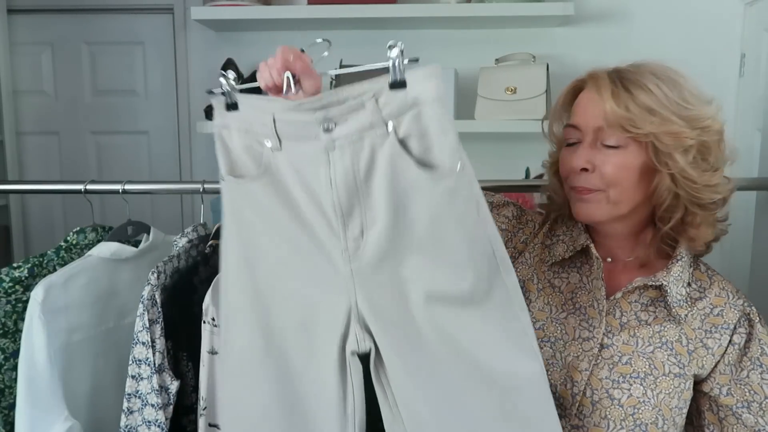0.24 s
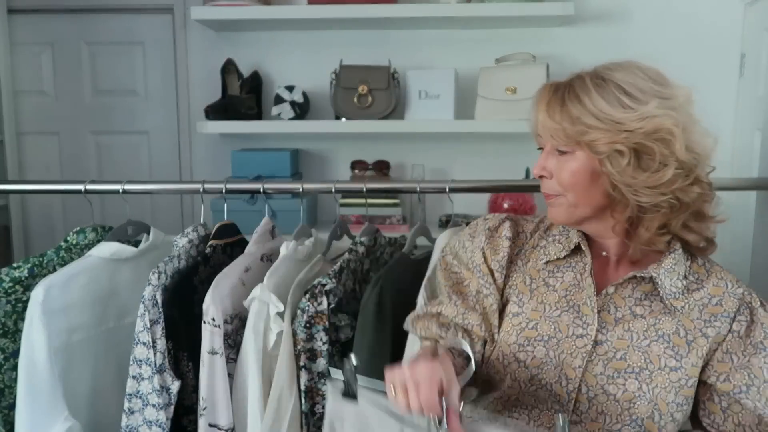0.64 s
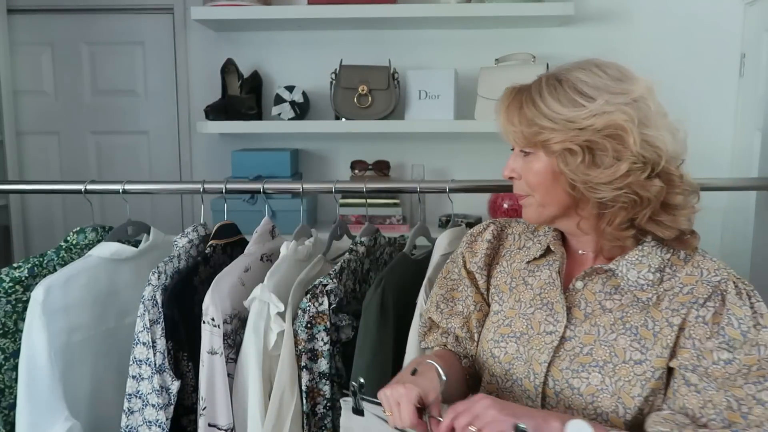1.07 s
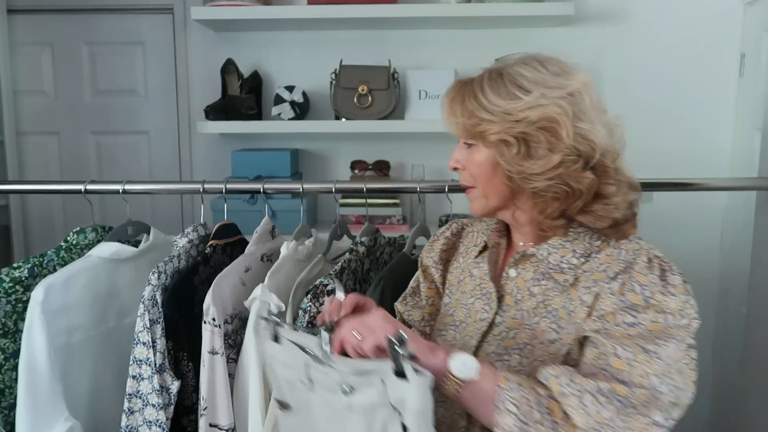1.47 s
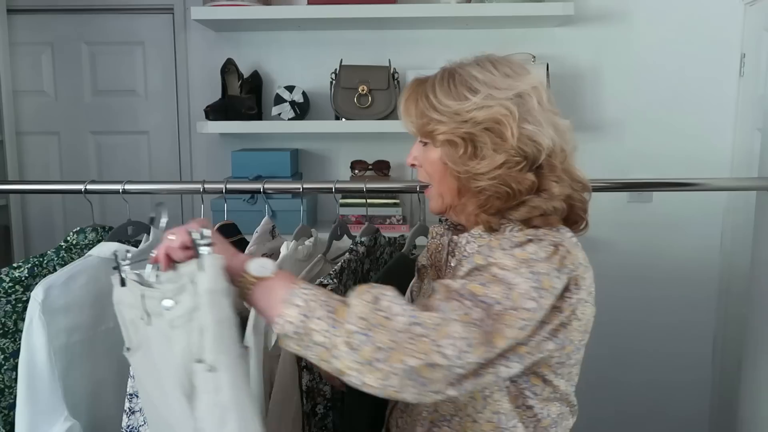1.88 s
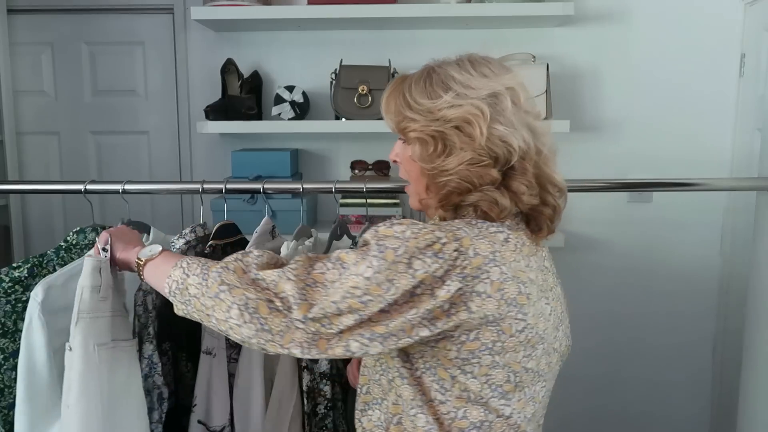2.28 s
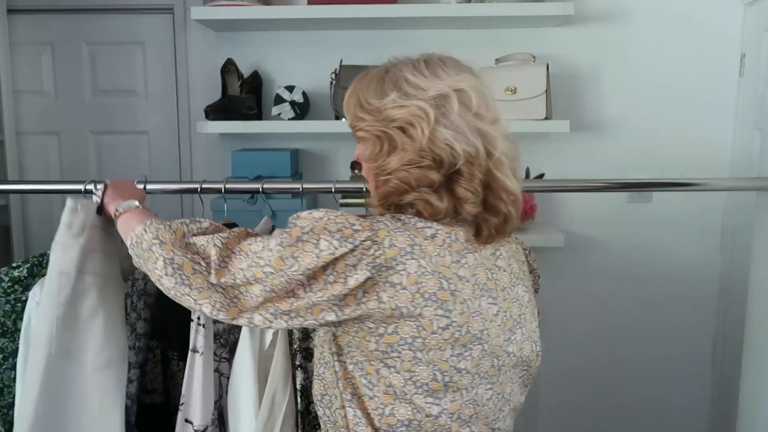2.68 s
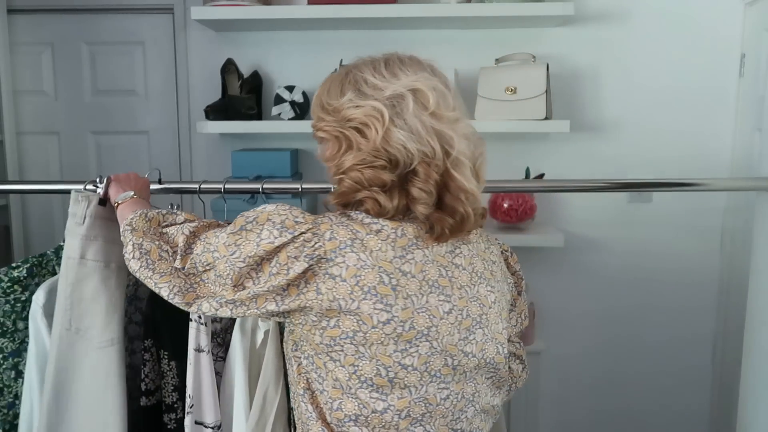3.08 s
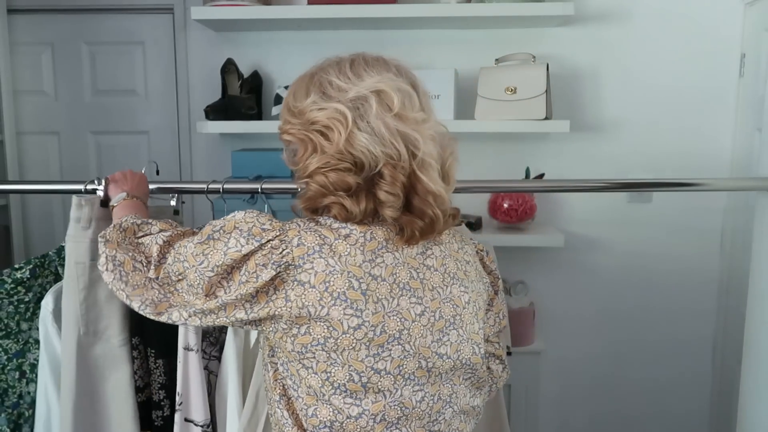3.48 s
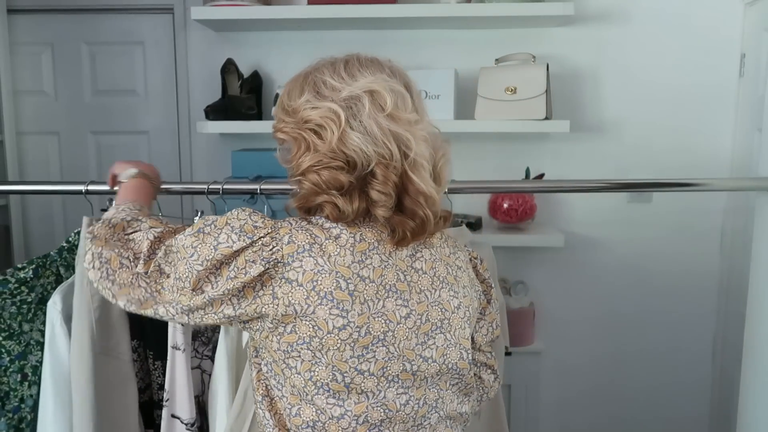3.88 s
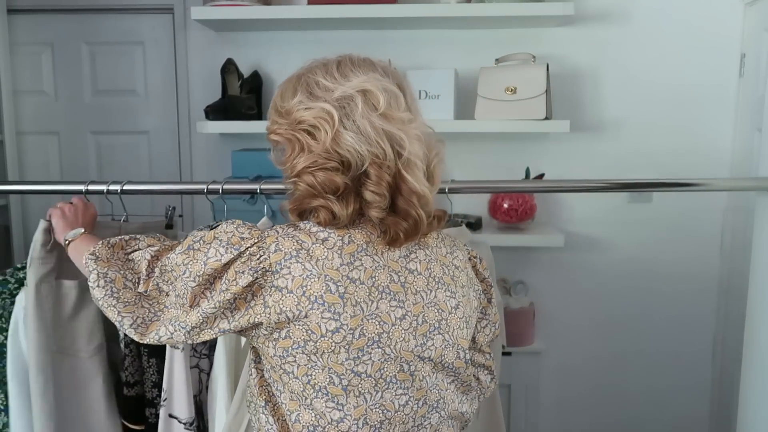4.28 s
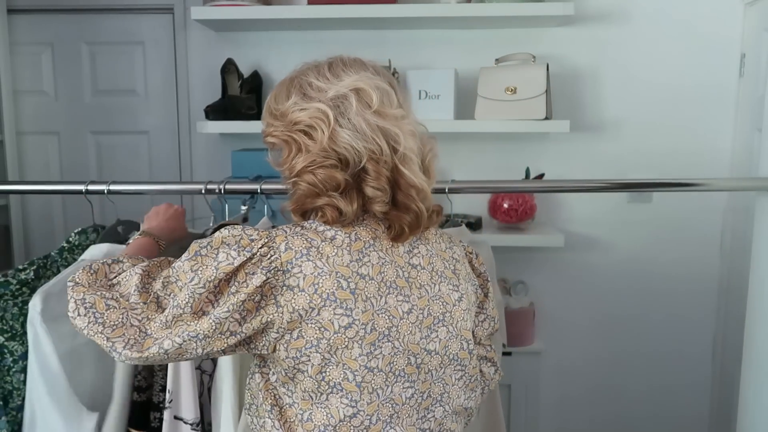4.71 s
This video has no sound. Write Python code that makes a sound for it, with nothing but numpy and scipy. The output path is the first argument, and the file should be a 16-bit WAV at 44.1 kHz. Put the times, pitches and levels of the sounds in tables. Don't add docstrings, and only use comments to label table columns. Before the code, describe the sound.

Quiet rustling and hollow rack knocks lead to three sharp metallic hanger strikes on a tube, then short gritty hook slides.

```python
import sys
import numpy as np
from scipy import signal
from scipy.fft import rfft, irfft, next_fast_len
from scipy.io import wavfile
from scipy.ndimage import uniform_filter1d

SR = 44100
rng = np.random.default_rng(int(sys.argv[2]) if len(sys.argv) > 2 else 0)


def gain_from_decibels(decibels):
    exponent = np.asarray(decibels, float) / 20
    return 10 ** exponent


def to_wav(s):
    ch = np.atleast_2d(s).T
    pcm = np.round(np.clip(ch, -1, 1) * 32767)
    wavfile.write(sys.argv[1], SR, pcm.astype(np.int16))


N = 218198


def evened(x):
    return x / np.sqrt(np.mean(x ** 2) + 1e-20)


def read(points, hz):
    f, value = np.transpose(points)
    return np.interp(np.log(hz + 1), np.log(f + 1), value)


def coloured(x, points):
    gain = gain_from_decibels(read(points, np.fft.rfftfreq(x.shape[-1], 1 / SR)))
    return irfft(rfft(x) * gain, x.shape[-1])


def add(mix, s, sound, peak_db):
    part = mix[round(s * SR):][:len(sound)]
    part += gain_from_decibels(peak_db) * sound[:len(part)] / abs(sound).max()


def softness(db, hard_db, fastest):
    return fastest * gain_from_decibels(0.3 * max(hard_db - db, 0))


def ring(modes, rise, spread=0, split=4.0, slow_hz=900, beat=.35, steep=1):
    t = np.arange(SR // 2) / SR
    luck = rng.random((len(modes), 7))
    hz, db, t60 = np.transpose(modes)[:, :, None]
    hz = hz * (1 + spread * (luck[:, :1] - .5))
    triple = 0
    for k in (-1, 0, 1):
        neighbour_hz = hz + split / t60 * (k + luck[:, [k + 5]] - .5)
        phase = luck[:, [k + 2]]
        triple = triple + np.sin(2 * np.pi * (neighbour_hz * t + phase)) * beat ** abs(k)
    onset = 1 - np.exp(-t / (rise * (1 + (slow_hz / hz) ** steep)))
    return (gain_from_decibels(db - 60 * t / t60) * triple * onset).sum(0)


def rattle(points, t60, rise, bass_lag=0.):
    t = np.arange(SR // 4) / SR
    collisions = rng.standard_normal(len(t)) * gain_from_decibels(7.03 * rng.standard_normal(len(t)))
    grit = evened(coloured(collisions, points))
    bass = coloured(grit, [(1100, 0), (1900, -40)])
    bass_missing = np.exp(-(t / (bass_lag + 1e-6)) ** 2)
    return (grit - bass * bass_missing) * gain_from_decibels(-60 * t / t60) * (1 - np.exp(-t / rise))


def resonate(x, hz, width):
    turn = np.exp(2j * np.pi * np.cumsum(hz) / SR)
    r = np.exp(-np.pi * width / SR)
    return 2 * (turn * signal.lfilter([1 - r], [1, -r], x / turn)).real


def clacks():
    # (time [s], level [dB], rattle t60 [s], rise [s], hanger ring over rattle [dB])
    blows = [
        (2.873, -17.5, 0.048, 0.0015, 1.5),
        (3.4345, -23, 0.046, 0.0017, -0.5),
        (3.7254, -11.5, 0.051, 0.0011, 1),
    ]
    # (frequency [Hz], density [dB per Hz])
    rattles = [
        [(120, -64), (260, -18), (410, -14), (520, -1.5), (722, -10), (1980, -19), (2290, -26), (2650, -21.5),
         (3760, -26), (6000, -39.5), (7500, -34), (12200, -51), (16000, -112)],
        [(120, -42), (200, -5), (450, -1), (1330, -20), (1460, -39), (2150, -13.5), (2320, -11), (2740, -10),
         (3000, -14), (6270, -22.5), (7680, -20), (9940, -40), (11300, -26.5), (16400, -37)],
        [(120, -52), (200, -11), (650, -36), (842, 5.5), (1460, -21.5), (2840, -1), (3740, -8), (5120, -2.5),
         (6400, -15), (7970, -9.5), (9580, -26), (11300, -16), (13100, -46), (14400, -22), (16400, -53)],
    ]
    # (time [s], level [dB])
    bounces = [
        (2.88, -22.5),
        (3.4375, -23),
        (3.7274, -13),
    ]
    # (time [s], level under the blow [dB])
    swings = [
        [(2.887, -15), (2.899, -8.5), (2.922, -9.5)],
        [(3.447, -16), (3.461, -7.5)],
        [(3.735, -3), (3.7435, -8)],
    ]
    stilled = [3.17, 3.7, 3.957]
    tube_hz = [2556, 2592, 7232]
    # (level [dB], t60 [s])
    tube_modes = [(0, 1.1), (-9, .4), (-9, .45)]
    tube_db = [-41, -51, -37.5]
    wire_hz = [318, 500, 651, 815, 1345, 1510, 1687, 1886, 2142, 2505, 2625, 2745, 3585, 4955]
    # (level [dB], t60 [s])
    wire_modes = [(-13, 0.19), (-7.5, 0.17), (-11, 0.19), (-6, 0.16), (-9, 0.1), (-8.5, 0.14), (-16, 0.27),
                  (-18, 0.25), (-6.5, 0.18), (-11, 0.17), (-12, 0.32), (-19, 0.24), (-24.5, 0.12),
                  (-21, 0.068)]
    clip_hz = [307, 1663, 2137, 2428, 2700, 4204, 4646, 6401, 6842, 7418, 7876, 8603, 11000, 14100]
    # (level [dB], t60 [s])
    clip_modes = [(-18, 0.35), (-22, 0.18), (-4, 0.2), (-22, 0.056), (-29, 0.15), (-11, 0.086), (5, 0.019),
                  (-32, 0.11), (-23, .14), (-13, 0.082), (-14, 0.12), (-17.5, .1), (-16, 0.08), (-23, 0.11)]
    heavy_hz = [305, 820, 945, 1884, 2130, 2505, 2826, 2948, 3176, 3510, 4270, 4975, 5115, 5368]
    # (level [dB], t60 [s])
    heavy_modes = [(-21, 0.17), (-11, 0.089), (-20, 0.18), (-26, 0.29), (1.5, 0.25), (-20, 0.091),
                   (5.5, 0.084), (0, 0.1), (-1, 0.18), (0, 0.053), (-3, 0.088), (-1, 0.065), (9.5, 0.071),
                   (1, 0.12)]

    crash, tones = np.zeros((2, N))
    tube = [(hz, *strength) for hz, strength in zip(tube_hz, tube_modes)]
    hangers = (wire_hz, wire_modes), (clip_hz, clip_modes), (heavy_hz, heavy_modes)
    for k, (s, db, t60, rise, ring_db) in enumerate(blows):
        burst = rattle(rattles[k], t60, rise, bass_lag=0.0093)
        hanger = [(hz, level, min(long, .4)) for hz, (level, long) in zip(*hangers[k])]
        hanger_ring = ring(hanger, rise, slow_hz=1340, beat=.2, steep=2.65)
        for at, less_db in ((s, 0), *swings[k]):
            add(crash, at, burst, db + 2.2 * less_db)
            add(tones, at, hanger_ring, db + ring_db + less_db)
        bounce_s, bounce_db = bounces[k]
        add(crash, bounce_s, rattle(rattles[k], 0.018, 0.00052, bass_lag=0.0096), bounce_db)
        left = stilled[k] - s - np.arange(SR // 2) / SR
        damping = gain_from_decibels(np.minimum(left, 0) * 900)
        add(tones, s, ring(tube, rise, beat=.13) * damping, tube_db[k])
    return crash, tones


def touches():
    # (time [s], level [dB])
    contacts = [
        (2.876, -21.5),
        (2.944, -29.5),
        (3.471, -36),
        (3.499, -48),
        (3.77, -24.5),
        (3.798, -34.5),
    ]
    # (frequency [Hz], level [dB], t60 [s])
    wall = [(2300, -11, 0.066), (2550, 0, 0.065), (2652, -6.5, 0.13), (2640, -2, 0.061), (2750, -3, 0.14),
            (2710, -2, 0.12)]
    out = np.zeros(N)
    for s, db in contacts:
        add(out, s, ring(wall, .002, spread=0.023, beat=0.67), db)
    return out


def pings():
    # (time [s], level [dB], frequency [Hz], rise [s], t60 [s])
    single_rings = [(1.363, -29.5, 162.3, 0.0053, 0.17), (1.377, -29, 748, 0.0019, 0.081),
                    (1.577, -39, 9930, 0.00027, 0.0066), (1.587, -36, 4500, 0.00033, 0.0065),
                    (1.6805, -29.5, 2270, 0.00018, 0.0039), (1.719, -36.5, 2200, .0002, 0.0068),
                    (1.7475, -39, 5400, 0.00018, 0.004), (1.7475, -52, 11600, .0002, .006),
                    (2.874, -21.5, 2142, 0.0043, 0.25), (2.88, -28, 2640, 0.007, 0.11),
                    (2.878, -31, 2860, .006, .13), (2.88, -48, 7240, 0.0035, 0.27),
                    (1.3605, -36.5, 1306, .0005, .03), (1.364, -30.5, 532, 0.0022, 0.071),
                    (1.575, -33, 540, .003, .08), (2.417, -39, 529, .003, 0.083),
                    (3.436, -45, 14900, .001, 0.037), (3.44, -38, 2620, .004, 0.17),
                    (3.727, -30, 14600, .0006, .04), (3.73, -42, 7300, .004, 0.28),
                    (3.775, -35.5, 2824, 0.0064, 0.15), (4.622, -50, 2680, .003, 0.045),
                    (2.877, -31.5, 498, 0.0027, 0.094), (2.885, -33, 259, 0.0072, 0.12),
                    (2.893, -43, 1140, 0.0033, 0.13), (2.925, -44, 658, 0.0092, 0.24),
                    (3.7277, -10, 5020, .0003, .012), (4.435, -52, 3600, 0.0017, 0.037),
                    (4.437, -54, 4600, 0.0018, 0.034), (4.726, -39, 240, 0.0043, 0.076),
                    (2.915, -26, 322.7, 0.0046, 0.085), (3.447, -39.5, 305, .008, 0.19),
                    (3.734, -22.5, 1104, 0.0014, 0.025), (3.74, -21.5, 830, 0.0034, 0.076),
                    (3.742, -30.5, 301, 0.017, 0.12), (3.785, -42, 940, 0.0064, 0.13),
                    (3.9592, -45, 2220, .0003, .015), (3.96, -44, 1120, 0.00062, 0.017)]
    out, t = np.zeros(N), np.arange(SR // 4) / SR
    for s, db, hz, rise, t60 in single_rings:
        envelope = (1 - np.exp(-t / rise)) ** 2 * gain_from_decibels(-60 * t / t60)
        add(out, s, np.sin(2 * np.pi * hz * t) * envelope, db)
    return out


def slides():
    # (hardest push [s], rise [s], fall [s], level [dB], share of plain grit [0-1])
    pushes = [
        [(1.682, 0.0039, 0.027, -50.5, 0.54), (1.753, 0.024, 0.017, -50, 0.3), (1.8, 0.038, 0.13, -59, 0.64)],
        [(4.245, 0.035, 0.026, -51.5, 0.34), (4.3, 0.023, 0.016, -46.5, 0.32),
         (4.34, 0.021, 0.031, -52.5, 0.36)],
        [(4.63, 0.018, 0.044, -46, 0.1), (4.73, 0.019, 0.028, -44, 0), (4.815, 0.043, 0.018, -47, 0.57)],
    ]
    # (frequency [Hz], width [Hz], level in first, second and third push [dB])
    woken = [
        [(1330, 300, -3, -8, -7), (1890, 400, -1, 7, 11), (2640, 270, -10, -6, -13), (6000, 1200, -4, -8, -16),
         (10900, 1300, -25, -16, -23)],
        [(285, 40, 4, -3, -15), (1127, 41, 3, 10, 7), (2140, 55, -12, -11, -15), (2450, 36, 2, 1, 0),
         (2910, 41, -7, -10, -13), (3870, 26, -25, -26, -8), (5060, 60, -17, -17, -12),
         (5770, 51, -17, -18, -14), (7500, 39, -19, -23, -25)],
        [(305, 14, 8.5, 5.5, -1), (1370, 29, 4, -15, -4), (2176, 33, -2, 1, -13), (2480, 32, -16, -1, 4),
         (2760, 72, -12, -1, -6), (4570, 40, -18, -8, -16), (4950, 70, -12, -8, -12), (5470, 63, -24, -19, -8),
         (7440, 46, -22, -16, -10), (8250, 80, -19, -14, -28), (9900, 55, -22, -15, -32),
         (11100, 60, -25, -20, -33)],
    ]
    push_db = 6.5
    wander, patchy_db = .006, 1.5

    out = np.zeros(N + SR)
    for rows, peaks in zip(pushes, woken):
        start = rows[0][0] - .3
        t = start + np.arange(SR) / SR
        unevenness = evened(uniform_filter1d(rng.standard_normal(len(t)), 250))
        slips = rng.standard_normal(len(t)) * gain_from_decibels(1.4 * unevenness)
        place = uniform_filter1d(rng.standard_normal(len(t)), 1500)
        place = evened(uniform_filter1d(place, 1500))
        tones = []
        for k, (hz, width, *_) in enumerate(peaks):
            swell = gain_from_decibels(patchy_db * np.roll(place, k * SR // 11))
            tones.append(swell * resonate(slips, hz * (1 + wander * place), 1.4 * width))
        grit = evened(coloured(slips, [(300, -27), (2500, 37.5), (6000, 25.0), (10500, -22)]))
        *tones, grit = coloured(np.vstack([*tones, grit]), [(10500, 9), (13000, -11)])
        for (s, rise, fall, db, share), woken_db in zip(rows, np.transpose(peaks)[2:]):
            away = np.where(t < s, (s - t) / rise, (t - s) / fall)
            share = np.clip(share, 0, 1)
            ringing = gain_from_decibels(13.5) * evened(gain_from_decibels(woken_db) @ tones)
            scrape = evened((1 - share) * ringing + share * grit)
            out[int(start * SR):][:SR] += scrape * gain_from_decibels(db - push_db * away ** 1.07)
    return out[:N]


def ticks():
    # (time [s], level [dB], body level [dB], brightness [0-1], rattle t60 [s])
    contacts = [(0.368, -45, 2, 0.87, 0.48), (0.882, -43, -23, 0.85, 0.035), (1.044, -41.5, -26, 1.1, 0.02),
                (1.509, -44.5, -33, 0.9, 0.02), (0.926, -45, 10, 0.9, 0.11), (1.359, -30, 8, 0, 0.076),
                (1.5734, -22.5, 2, 0.92, 0.076), (1.6807, -31, 2.5, 0.5, 0.053),
                (1.718, -38.5, -20, 1, 0.04), (1.7438, -39.5, -2, 0.7, 0.063), (2.153, -47, -29, 0, 0.29),
                (2.4865, -33.5, -11, 0.26, 0.023), (2.4914, -32, 16, 1, 0.036), (2.507, -46, 7, 0, 0.027),
                (2.812, -35, -9, 1, 0.12), (3.272, -37, 6, 0, 0.045), (3.3638, -30, -10, 0.8, 0.033),
                (3.368, -25.5, 1.5, 0.86, 0.024), (3.4255, -28.5, -3, 1, 0.17),
                (3.713, -33.5, 19, 1.1, 0.31), (3.9583, -35.5, -21, 0.91, 0.036),
                (4.118, -33.5, -6.5, 0.56, 0.032), (4.4347, -45.5, -6, 1, 0.056),
                (4.548, -42, -16, 0.9, 0.043), (4.6091, -45, -8, 0.4, 0.14), (4.714, -37, -15, 1, 0.04)]
    band_hz = [550, 2100, 5000, 10000]
    dull_db = [-21.5, -59]
    sharp_db = [1.5, -14]
    out = np.zeros(N)
    for s, db, body_db, sharp, t60 in contacts:
        bright, top = np.add(dull_db, sharp * np.subtract(sharp_db, dull_db))
        per_hz = np.array([body_db, 0, bright, top]) - 10 * np.log10(band_hz)
        colour = [(150, per_hz[0] - 15), *zip(band_hz, per_hz), (16000, per_hz[3] - 12)]
        add(out, s, rattle(colour, t60, softness(db, -23, 0.0003)), db)
    return out


def thuds():
    # (time [s], level [dB], knock [dB], boom [dB], deep [dB])
    steps = [(0.897, -39, -28, -23, -6), (0.912, -37, -5.5, -29, 0), (0.944, -54, 8.5, -26, -21),
             (1.3592, -23.5, -8, -14, -3.5), (1.573, -36.5, -2, -22, -16), (2.337, -44.5, -6, -28, 1),
             (2.345, -45.5, -8, -28, -4), (2.415, -32, -9, -5.5, -13), (2.453, -40.5, -28, -26, 20),
             (3.561, -50, -18, -25, -5), (4.276, -45, -6.5, -27, -28), (4.728, -51, 6, -25, 6),
             (4.93, -45, -28, -20, 7)]
    # (frequency [Hz], level [dB], t60 [s])
    boards = [(71.4, -19.5, 0.66), (151.2, 2.0, 0.22), (242.3, -4.0, 0.39), (323.3, -1.0, 0.14),
              (431, -18.5, 0.24), (483, -22.5, 0.32), (707, -9.5, 0.066), (900, -16, 0.1),
              (985, -36.0, 0.18), (1354, -48.0, 0.3), (273.0, -2.5, 0.21), (2084, -30, 0.03)]
    heavy_ring, ring_per_db = 0.7, -0.0141
    out = np.zeros(N)
    for s, db, knock, boom, deep in steps:
        length = heavy_ring + ring_per_db * (-30.0 - db)
        lift = [(70, boom + 12), (155, deep + 3), (236, 0.011), (431, 0.0018), (570, knock + 6)]
        modes = [(hz, level + read(lift, hz), length * t60) for hz, level, t60 in boards]
        add(out, s, ring(modes, softness(db, -19.0, 0.00039), spread=0.023, slow_hz=298), db)
        heel = [(90, 1.5), (210, 13.5), (900, 4.5), (3000, -30.0), (8000, -48)]
        add(out, s, rattle(heel, 0.09, softness(db, -6, 0.0045)), db + knock)
    return out


def wobble():
    # (time [s], level [dB], frequency [Hz])
    knocks = [(0.408, -43.5, 428), (0.453, -43, 380), (0.489, -53, 386), (0.552, -48.5, 398),
              (0.646, -48, 431), (0.71, -51.5, 384), (0.809, -48.5, 400), (0.999, -47.5, 380),
              (1.041, -46.5, 420), (1.087, -45, 405), (1.108, -55, 433), (1.18, -42, 392), (1.22, -57, 374),
              (1.266, -49.5, 396), (1.315, -49, 430), (1.78, -46.5, 386), (1.819, -44, 388),
              (1.914, -43.5, 391), (1.948, -50, 381), (2.01, -45, 398), (2.052, -50, 422),
              (2.114, -45, 397), (2.148, -46, 388), (2.181, -48, 396), (2.223, -47.5, 386),
              (2.284, -50, 430), (2.532, -52, 410), (2.586, -50, 420), (3.251, -47, 404),
              (3.323, -49.5, 431), (3.581, -42.5, 380), (3.658, -41.5, 372), (3.845, -39.5, 381)]
    # (time [s], level [dB])
    low_tones = [
        (1.366, -57),
        (3.191, -41.5),
        (3.217, -42),
    ]
    low_tone_hz, sag_per_s = 336, 2.3
    out, t = np.zeros(N), np.arange(SR // 8) / SR
    envelope = (1 - np.exp(-t / 0.0029)) * gain_from_decibels(-60 * t / 0.076)
    for s, db, hz in [*knocks, *[(*row, low_tone_hz) for row in low_tones]]:
        add(out, s, np.sin(2 * np.pi * hz * t * (1.02 - sag_per_s * t)) * envelope, db)
    return out


def rustle():
    # (time [s], level [dB])
    effort = [(0.0, -59), (0.87, -52.5), (1.3, -54.5), (1.6, -50), (2.25, -50), (2.81, -49.5), (2.96, -50),
              (3.21, -49.5), (3.88, -48), (4.45, -53), (4.74, -48), (4.95, -48)]
    # (frequency [Hz], density [dB per Hz])
    cloth = [(59, -37), (100, -9), (270, -4), (368, -10.5), (481, -10.5), (2570, -16.5), (2850, -15.5),
             (12900, -41), (14000, -51)]
    crackle = evened(uniform_filter1d(rng.standard_normal(N), 600))
    grit = rng.standard_normal(N) * gain_from_decibels(1.8 * crackle)
    gain = gain_from_decibels(np.interp(np.arange(N) / SR, *np.transpose(effort)))
    return gain_from_decibels(-6.0) * gain * evened(coloured(grit, cloth))


def room(x):
    # (frequency [Hz], t60 [s])
    decay = [(150, 0.41), (660, 0.28), (1740, 0.18), (4590, 0.2), (12000, 0.12)]
    taps = np.zeros((2, SR // 2))
    jitter = rng.integers(0, 20, (2, (SR // 2 - 121) // 20))
    at = np.arange(120, SR // 2 - 20, 20) + jitter
    np.put_along_axis(taps, at, rng.choice([-1., 1.], at.shape), 1)
    hz, t, z = signal.stft(taps, SR, nperseg=256)
    fade = gain_from_decibels(-60 * t / read(decay, hz)[:, None])
    tail = signal.istft(z * fade, SR, nperseg=256)[1]
    return signal.fftconvolve(x[None], tail / np.linalg.norm(tail[0]), axes=1)[:, :N]


def ports(direct, tails):
    # (frequency [Hz], difference over sum [dB])
    difference = [(60, -37), (110, -47), (200, -47), (380, -17), (700, -27), (1290, -10), (2380, -12),
                  (4400, 1.5), (8120, 6.5), (15000, 33)]
    total = direct + tails[0]
    turned = signal.hilbert(direct, next_fast_len(N))[:N].imag
    side = coloured(.4 * turned + .95 * tails[1], difference)
    side = coloured(side, [(9000, -1), (14000, -17)])
    return np.array([total + side, total - side])


def rumble():
    # (frequency [Hz], width [Hz], level [dB])
    machine = (61.2, 4.4, -66.5)
    hum_hz, width, hum_db = machine
    surge_s, peak_db, calm_db = 0.52, -59.5, -84
    swell, sink = 23, 16
    deep, hum = rng.standard_normal((2, N))
    deep = evened(coloured(deep, [(12, -6), (30, 19), (45, -10), (70, -65)]))
    steady_hz = np.full(N, hum_hz)
    hum = evened(resonate(resonate(hum, steady_hz, width), steady_hz, width))
    late = np.arange(N) / SR - surge_s
    surge_db = peak_db - np.maximum(-late * swell, late * sink)
    return gain_from_decibels(np.maximum(surge_db, calm_db)) * deep + gain_from_decibels(hum_db) * hum


def hiss():
    # (frequency [Hz], density [dB per Hz])
    colour = [(41, -13.5), (70, -6), (170, -10.5), (307, -10), (412, -8.5), (441, -15), (1020, -14.5),
              (1310, -16), (12700, -39.5), (16000, -61)]
    # (frequency [Hz], left-right likeness [0-1 after clipping])
    likeness = [(60, 1.5), (180, 0.48), (550, -1.5), (1650, -11), (4970, 0.6), (15000, -2.5)]
    # (frequency [Hz], level [dB])
    electronics = (13006, -80)
    a, b = rfft(rng.standard_normal((2, N)))
    same = np.clip(read(likeness, np.fft.rfftfreq(N, 1 / SR)), 0, 1)
    pair = irfft([a, same * a + np.sqrt(1 - same ** 2) * b], N)
    pair = coloured(pair, colour)
    whine_hz, whine_db = electronics
    whine = gain_from_decibels(whine_db) * np.sin(2 * np.pi * whine_hz * np.arange(N) / SR)
    return gain_from_decibels(-55.5 - 0.5) * pair / pair.mean(0).std() + whine


def scene():
    # (frequency [Hz], gain [dB])
    bass_dry = [(120, -15), (300, -11), (430, 1.5), (600, -1.5), (1200, 2)]
    crash, tones = clacks()
    blows = crash + gain_from_decibels(-3.5) * ticks() + gain_from_decibels(3.5) * thuds() + gain_from_decibels(-6.0) * wobble()
    steady = tones + touches() + pings() + slides() + rustle()
    direct = gain_from_decibels(4.5) * blows + steady
    sent = gain_from_decibels(2.0) * blows + gain_from_decibels(-12.0) * steady
    return ports(direct, room(coloured(sent, bass_dry))) + rumble()


def roll_off(x):
    return signal.sosfilt(signal.butter(12, 16500, fs=SR, output="sos"), x)


def record(dry):
    heard = coloured(dry + hiss(), [(16000, 0), (16500, -30)])
    return roll_off(heard)


dry = scene()
out = record(dry)
to_wav(out)
```